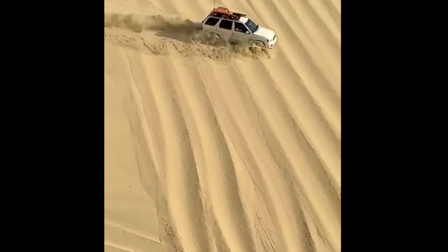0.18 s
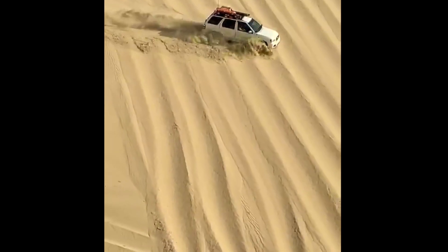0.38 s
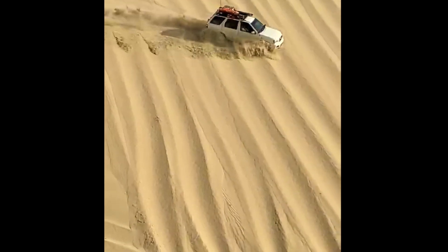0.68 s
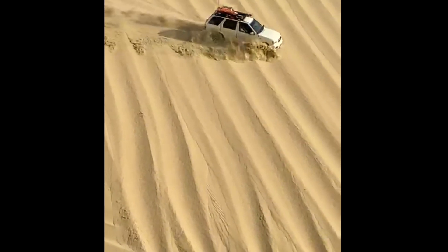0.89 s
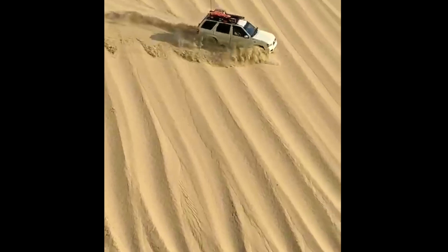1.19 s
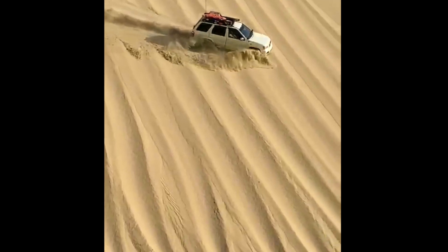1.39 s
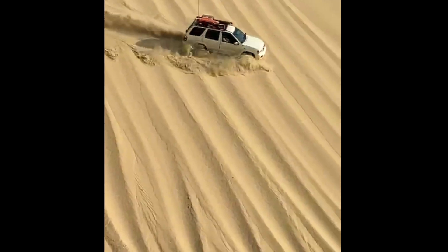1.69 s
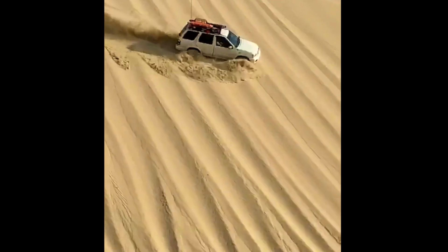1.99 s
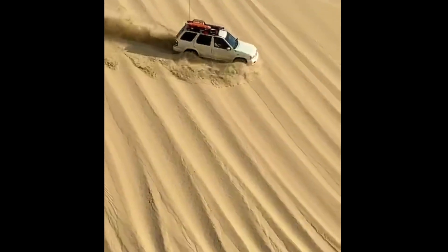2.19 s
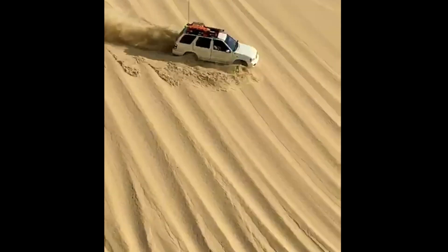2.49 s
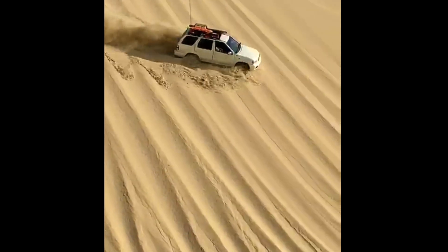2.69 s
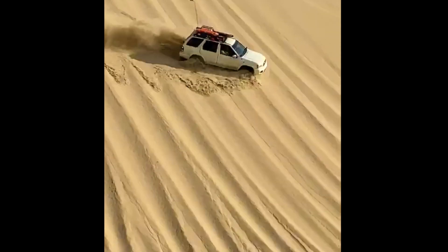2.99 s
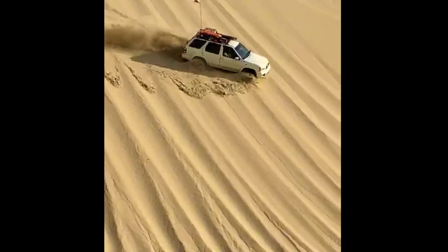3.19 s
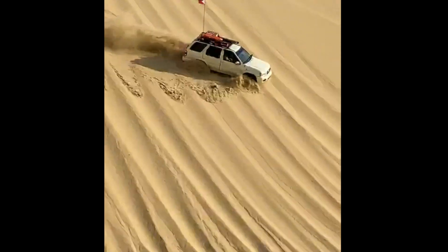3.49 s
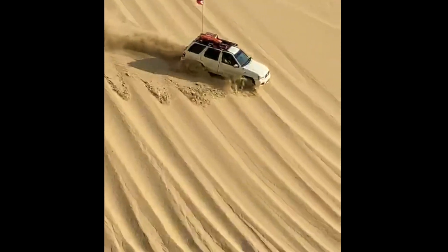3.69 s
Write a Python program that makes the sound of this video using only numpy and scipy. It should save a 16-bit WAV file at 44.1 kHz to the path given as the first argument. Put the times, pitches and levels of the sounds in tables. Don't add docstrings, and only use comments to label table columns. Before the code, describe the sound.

SUV engine straining on a dune, steady whine, gritty sand hiss, ticking pebbles, buffeting wind gusts.

```python
import sys
import numpy as np
from scipy import signal
from scipy.fft import rfft, irfft, next_fast_len
from scipy.io import wavfile
from scipy.ndimage import uniform_filter1d, minimum_filter1d, map_coordinates

SR = 44100
rng = np.random.default_rng(int(sys.argv[2]) if len(sys.argv) > 2 else 0)


def voltage_ratio(decibels):
    exponent = np.asarray(decibels, float) / 20
    return 10 ** exponent


def file_out(sig):
    cols = np.atleast_2d(sig).T
    lim = np.clip(cols, -1, 1)
    pcm = np.round(lim * 32767).astype(np.int16)
    wavfile.write(sys.argv[1], SR, pcm)


N = 169785

# f/Hz, likeness/1
WIND_COHERENCE = [(80, 1), (400, 0.91)]


def unit(x):
    return x / np.sqrt(np.mean(x ** 2) + 1e-20)


def along(points, hz):
    f, v = np.transpose(points)
    return np.interp(np.log(hz + 1), np.log(f + 1), v)


def curves(rows):
    s, *columns = np.transpose(rows)
    return [np.interp(np.arange(N) / SR, s, column) for column in columns]


def wobble(rate):
    return map_coordinates(rng.standard_normal(N // 100), [np.arange(N) * rate / SR])


def filtered(x, response):
    m = next_fast_len(N + SR // 2)
    return irfft(rfft(x, m) * response(np.fft.rfftfreq(m, 1 / SR)), m)[..., :N]


def rush(spectrum, alike, patchy_db):
    z = signal.stft(rng.standard_normal((2, N)), nperseg=512)[2]
    field = uniform_filter1d(rng.standard_normal(z.shape[1:]), 6, 0)
    field = uniform_filter1d(field, 14, 1)
    pair = signal.istft(z * voltage_ratio(patchy_db * unit(field)), nperseg=512)[1][:, :N]

    def shares(hz):
        turn = np.arccos(np.clip(along(alike, hz), -1, 1)) / 2
        return voltage_ratio(along(spectrum, hz)) * [np.cos(turn), np.sin(turn)]

    mid, side = filtered(pair, shares)
    return unit(np.array([mid + side, mid - side]))


def exhaust(turns, load_db):
    # f/Hz, width/Hz, level/dB
    modes = [(374, 116, 1.5), (815, 181, 0), (977, 57, 1), (1308, 277, -7), (2110, 200, -4)]
    jitter, gas_share = 0.2005, 0.48
    fire = 3 * turns
    count = np.arange(1, int(fire[-1]))
    uneven = rng.standard_normal((len(count), 2))
    at = np.interp(count + jitter * uneven[:, 0], fire, np.arange(N)).astype(int)
    pulses = np.bincount(at, voltage_ratio(3 * uneven[:, 1]), N)
    gas = rng.standard_normal(N) * (1 + 0.28 * np.cos(2 * np.pi * fire))
    drive = np.sqrt(1 - gas_share) * unit(pulses - pulses.mean()) + np.sqrt(gas_share) * unit(gas)

    def pipe(f):
        return sum((-1) ** k * voltage_ratio(db) * 1j * f * width / (c * c - f * f + 1j * f * width)
                   for k, (c, width, db) in enumerate(modes))

    rung = unit(filtered(filtered(drive, pipe), pipe))
    return voltage_ratio(-37) * voltage_ratio(load_db - load_db.mean()) * rung


def orders(turns, multiples, levels_db, unsteady_db):
    total = 0
    for k, db in zip(multiples, levels_db):
        phase = 2 * np.pi * k * turns + 0.015 * k * wobble(25)
        total = total + np.sqrt(2) * voltage_ratio(db + unsteady_db * wobble(6.6)) * np.sin(phase)
    return total


def shaft_orders(turns, low_db, band_db, load_db):
    # order/1, and their level/dB
    low_orders, low_levels = [18, 19, 20], [2.5, -4, -8.5]
    # order/1, and their level/dB
    side_orders, side_levels = [23, 25, 42, 46], [-5, -16.5, -23.5, -17]
    # order/1, and their level under the load/dB
    high_orders, high_levels = [36, 42, 45, 46.3, 51, 63, 69.5], [-27, -21, -23, -18, -23, -28, -22]
    low = voltage_ratio(low_db) * orders(turns, low_orders, low_levels, unsteady_db=1.0)
    sidebands = voltage_ratio(band_db) * orders(turns, side_orders, side_levels, unsteady_db=3.0)
    high = voltage_ratio(load_db) * orders(turns, high_orders, high_levels, unsteady_db=2.5)
    return low + sidebands + high


def main_whine(turns, whine_db):
    # t/s, left over right level/dB
    whine_lean = [(0, 17), (1.1, 3.5), (1.4, -0.5), (2.5, -7), (3.3, 3.5)]
    lean_db, = curves(whine_lean)
    phase = 2 * np.pi * 24 * turns + 0.76 * wobble(30)
    tone = np.sqrt(2) * voltage_ratio(whine_db + 1.8 * wobble(14)) * np.sin(phase)
    return tone * voltage_ratio([lean_db / 3, -lean_db * 2 / 3])


def engine_roar(load_db):
    # f/Hz, density level/dB per Hz
    roar_spectrum = [(30, -13.5), (70, -2), (330, -17), (600, -16.5), (900, -11), (2000, -19.5),
                     (4000, -23.5), (12000, -29.5)]
    # f/Hz, likeness/1
    coherence = [(100, 1), (400, 0.15), (1400, 0.79), (1800, 0.23), (7000, 0.94)]
    return voltage_ratio(load_db + 4 + 0.49 * wobble(11)) * rush(roar_spectrum, coherence, patchy_db=2.0)


def bounce(x):
    # t/s, delay of the reflected path/s
    path_delay = [(0, 0.001917), (1.6, 0.00198), (2.4, 0.001866), (3.1, 0.00182), (3.85, 0.00202)]
    delay, = curves(path_delay)
    upper = filtered(x, lambda f: 1 / (1 + (1250 / (f + 1)) ** 8) / (1 + (f / 2900) ** 4))
    when = np.arange(N) - delay * SR
    return x - voltage_ratio(-4.5) * np.array([map_coordinates(channel, [when]) for channel in upper])


def engine():
    # t/s, shaft speed f/Hz, whine level/dB, sideband level/dB, low order level/dB, load level/dB
    running = [(0.0, 42.96, -47, -62, -42.5, -41), (0.49, 42.5, -39.5, -61, -40, -41.5),
               (0.8, 41.12, -42.5, -56.5, -46.5, -40), (1.06, 41.93, -37.5, -53, -38, -40.5),
               (1.38, 41.32, -45, -69.5, -45, -40), (1.52, 42.53, -43.5, -44, -42, -42),
               (1.7, 43.86, -41.5, -40, -48.5, -39), (1.97, 42.32, -45.5, -39, -44, -42.5),
               (2.17, 42.9, -42, -34, -53, -39.5), (2.3, 43.9, -47, -48, -45, -38.5),
               (2.5, 44.15, -45, -40.5, -55, -37), (2.87, 42.68, -42, -32, -56, -39),
               (3.1, 41.28, -40, -43, -48, -39.5), (3.32, 40.63, -36, -44, -54, -38.5),
               (3.47, 39.9, -47, -39.5, -53, -39.5), (3.75, 40.66, -49, -65, -54, -40),
               (3.85, 41.3, -58.5, -46, -43, -40)]
    speed, whine_db, band_db, low_db, load_db = curves(running)
    turns = np.cumsum(speed) / SR
    rough = bounce(exhaust(turns, load_db) + engine_roar(load_db))
    return shaft_orders(turns, low_db, band_db, load_db) + rough + main_whine(turns, whine_db)


def breeze():
    # t/s, steady wind level/dB
    wind_level = [(0.0, -37), (0.23, -30), (0.71, -25), (0.97, -29.5), (1.23, -30.5), (1.64, -18.5),
                  (2.3, -28), (2.56, -27.5), (2.73, -30.5), (2.91, -38.5), (3.4, -29), (3.85, -36.5)]
    # f/Hz, density level/dB per Hz
    rumble_spectrum = [(25, -29.5), (60, 1.5), (150, -3.5), (380, -4.5), (620, -8.5), (850, -26.5),
                       (1500, -86.5)]
    breeze_db, = curves(wind_level)
    lumps = voltage_ratio(2.4 * wobble(45) + .8 * wobble(9))
    rumble = unit(lumps * rush(rumble_spectrum, WIND_COHERENCE, patchy_db=1.2))
    return voltage_ratio(breeze_db - 3.5) * rumble


def crosswind():
    # t/s, level/dB
    cross_level = [(0, -42.5), (.3, -57), (.41, -29), (.58, -38), (.75, -20.5), (.87, -29), (1.08, -27),
                   (1.22, -25.5), (1.38, -29), (1.62, -45), (1.77, -28.5), (2, -54.5), (2.5, -44),
                   (2.8, -28), (3.1, -45.5), (3.45, -53), (3.6, -42), (3.85, -79)]
    # f/Hz, density level/dB per Hz
    cross_spectrum = [(60, -17.5), (150, 0), (400, 3.5), (800, -3), (1300, -16.5), (1700, -35.5),
                      (2500, -94.5)]
    cross_db, = curves(cross_level)
    noise = rush(cross_spectrum, WIND_COHERENCE, patchy_db=-7)[0]
    return voltage_ratio(cross_db + 2.2 * wobble(14)) * noise * [[1], [-1]]


def grit():
    # t/s, peak level/dB, pitch f/Hz
    pebbles = [(0.0418, -31, 3420), (0.2483, -31, 3650), (0.853, -31, 3600), (0.929, -49, 3520),
               (1.064, -33, 2900), (1.1206, -37, 3440), (1.1563, -28, 3560), (1.5758, -29.5, 4660),
               (1.8813, -30.5, 2780), (2.195, -31, 3624), (2.381, -31.5, 3080), (2.4872, -24, 3443),
               (2.5734, -29, 3080), (2.8834, -29.5, 3548), (3.0884, -25, 3360), (3.1652, -28.5, 3443),
               (3.3475, -24, 3340), (3.436, -29.5, 3800), (3.6306, -29, 3580), (3.706, -26, 3550),
               (1.2185, -27.5, 1990),
        (1.2471, -25, 2200),
        (1.313, -30.5, 1860),
    ]
    grains_per_s, grain_db, grain_hz = 270, -54, 3560
    hits = [(s, db - 4, hz) for s, db, hz in pebbles]
    for a, b, c in rng.random((int(grains_per_s * N / SR), 3)):
        hits.append((a * N / SR, grain_db - 4 * np.log(b + 0.012), grain_hz * voltage_ratio(8 * (c - .5))))
    out = np.zeros(N + SR)
    t = np.arange(SR // 32) / SR
    rise = 1 - np.exp(-t / 0.00075)
    for s, db, hz in hits:
        modes = np.sin(2 * np.pi * hz * t) + voltage_ratio(-1) * np.sin(2 * np.pi * 1.32 * hz * t)
        ring = modes * voltage_ratio(-60 * t / .03)
        crack = voltage_ratio(11 - 60 * t / .016) * rng.standard_normal(len(t))
        out[round(s * SR):][:len(t)] += voltage_ratio(db) * (ring + crack) * rise
    return filtered(out[:N], lambda f: 1 / (1 + (1700 / (f + 1)) ** 4) / (1 + (f / 5600) ** 8))


def gusts():
    gust_events = [(0.408, 0.023, -25.5, -11.5), (0.461, 0.029, -25, 1), (0.494, 0.049, -25, -7),
                   (0.539, 0.03, -18, -9), (0.583, 0.023, -39, 8), (0.657, 0.016, -28, -29),
                   (0.69, 0.025, -23, -10), (0.728, 0.019, -20, -1.5), (0.757, 0.034, -18.5, -5),
                   (0.785, 0.027, -12.5, -5.5), (0.817, 0.03, -21.5, 2.5), (0.856, 0.027, -16, -5.5),
                   (0.955, 0.017, -30, -17), (0.988, 0.024, -24, -1.5), (1.115, 0.025, -27.5, -11),
                   (1.15, 0.025, -21, -14), (1.166, 0.04, -18.5, -5), (1.212, 0.025, -20.5, -1),
                   (1.238, 0.03, -21, -15.5), (1.29, 0.02, -23, -18.5), (1.329, 0.017, -32.5, -11.5),
                   (1.411, 0.045, -29.5, -2.5), (1.453, 0.036, -20.5, -1), (1.484, 0.038, -17, -7.5),
                   (1.561, 0.03, -20, -10), (1.601, 0.032, -29.5, 3.5), (1.645, 0.035, -22, -3),
                   (1.686, 0.02, -16, -3), (1.697, 0.011, -22.5, -12), (1.736, 0.038, -27.5, 4),
                   (1.784, 0.028, -28, 1.5), (1.828, 0.033, -31.5, -1), (1.873, 0.044, -33.5, -1.5),
                   (1.947, 0.026, -34, -0.5), (2.003, 0.02, -28, -0.5), (2.08, 0.022, -31, 4),
                   (2.116, 0.037, -31.5, 3), (2.189, 0.05, -31.5, -3), (2.507, 0.031, -34, -0.5),
                   (2.554, 0.031, -34, 1), (2.609, 0.015, -31.5, 2.5), (2.651, 0.043, -33.5, -2.5),
                   (3.131, 0.029, -36, -4.5), (3.397, 0.032, -34, -4), (3.514, 0.057, -33, -7)]
    rise_s, fall_s = .007, .012
    t = np.arange(N) / SR

    def edge(u):
        return 1 / (1 + np.exp(-np.clip(4 * u, -50, 50)))

    power = 0
    for s, hold, db, middle_db in gust_events:
        shape = edge((t - s) / rise_s) * edge((s + hold - t) / fall_s)
        power = power + (voltage_ratio([[db], [db + middle_db]]) * shape) ** 2
    return np.sqrt(power)


def beat(spectrum):
    x = rush(spectrum, WIND_COHERENCE, patchy_db=1.5)
    power = np.abs(uniform_filter1d(np.mean(x ** 2, 0), SR // 50))
    return unit(x / np.sqrt(power + 0.15))


def buffet(gust):
    # f/Hz, density level/dB per Hz
    thump_spectrum = [(25, -35.5), (50, -8.5), (75, -1.5), (130, 0), (190, -1), (250, -27.5), (400, -68.5)]
    flap_spectrum = [(120, -48), (190, -6), (230, 0), (340, -2.5), (420, -8), (520, -21), (700, -72.5)]
    rasp_spectrum = [(300, -51.5), (420, 2.5), (520, -2), (640, -7), (760, -15.5), (950, -61.5)]
    # t/s, top part relative to the middle part level/dB
    rasp_level = [(0, -5), (1.1, -13.5), (1.3, -21.5), (1.45, -9.5), (1.75, -2), (2.7, -0.5), (3.85, -0.5)]
    rasp_db, = curves(rasp_level)
    middle = beat(flap_spectrum) + voltage_ratio(rasp_db) * beat(rasp_spectrum)
    return gust[0] * beat(thump_spectrum) + gust[1] * middle


def wind_filter(gust, sound):
    depth_db, threshold_db, memory_s = 30, -24, .13
    low = filtered(sound.mean(0), lambda f: 1 / (1 + (f / 700) ** 24) / (1 + (352 / (f + 1)) ** 6))
    held = -minimum_filter1d(-gust[0], int(memory_s * SR))
    windy = np.abs(uniform_filter1d(held, SR // 20)) / voltage_ratio(threshold_db)
    return low * (1 - voltage_ratio(-depth_db * np.tanh(windy ** 2)))


def clods():
    # t/s, peak level/dB, pitch f/Hz
    lumps = [
        (2.003, -23, 614),
        (2.293, -22.5, 847),
        (2.565, -22.5, 818),
    ]
    t = np.arange(N) / SR
    total = 0
    for s, db, hz in lumps:
        after = np.maximum(t - s, 0)
        decay = voltage_ratio(db - 60 * after / 0.1)
        total = total + decay * (1 - np.exp(-after / 0.0019)) * np.sin(2 * np.pi * hz * after)
    return total


def two_ports(x):
    # f/Hz, left over right level/dB
    port_lean = [(600, -1.5), (1000, 5), (1350, 5.5), (1700, 5.5), (3000, -0.2)]
    # f/Hz, phase by which the left leads/rad
    port_lead = [(300, -0.0056), (1030, 1.64), (1300, -0.28), (4300, 0.76), (4700, 0.97)]

    def response(f):
        level = voltage_ratio(np.outer([.5, -.5], along(port_lean, f)))
        return level * np.exp(np.outer([.5j, -.5j], along(port_lead, f)))

    return filtered(x, response)


def gate(x):
    hz, _, z = signal.stft(x, SR, nperseg=2048)
    power = uniform_filter1d(np.abs(z) ** 2, size=8, axis=0)
    power = np.abs(uniform_filter1d(power, size=2, axis=1))
    limit = power[np.searchsorted(hz, 6000)].mean() * voltage_ratio(2 * -13)
    passed = (power > limit) | (hz[:, None] < 4500)
    return signal.istft(z * passed, SR, nperseg=2048)[1][:N]


def scene():
    gust = gusts()
    sound = two_ports(engine() + grit() + clods()) + breeze()
    return sound - wind_filter(gust, sound) + buffet(gust) + crosswind()


def top_cut(x):
    return signal.sosfilt(signal.butter(12, 11950, fs=SR, output="sos"), x)


def record(dry):
    # f/Hz, level/dB
    sum_response = [(4000, 0), (4700, -6.5), (5030, -15), (5350, -0.5), (6400, -0.5), (6900, -10.5),
                    (8100, -19.5), (8300, -120)]
    # f/Hz, level/dB
    difference_response = [(1400, -3.5), (1600, -14.5), (3000, -4.5), (4250, -22.5), (4700, 0), (6000, 6.5),
                           (9700, -5), (11300, -1.5)]
    mid = gate(filtered(dry.mean(0), lambda f: voltage_ratio(along(sum_response, f))))
    side = filtered((dry[0] - dry[1]) / 2, lambda f: voltage_ratio(along(difference_response, f)))
    return top_cut(np.array([mid + side, mid - side]))


dry = scene()
out = record(dry)
file_out(out)
```